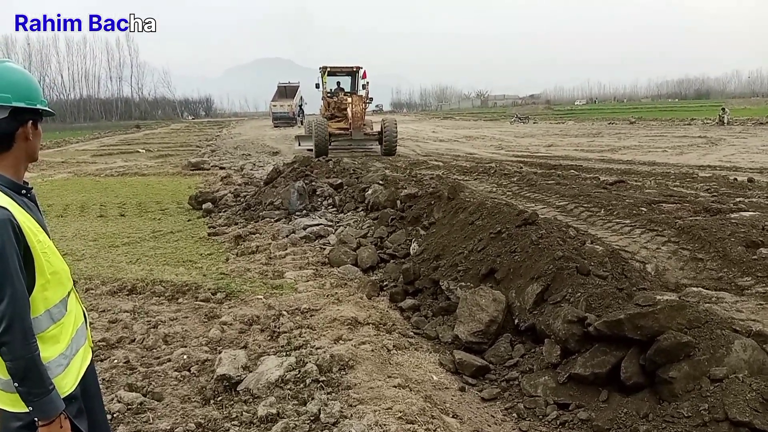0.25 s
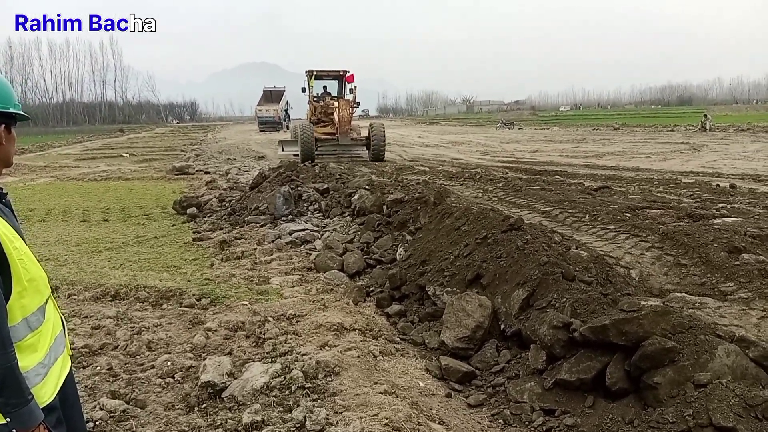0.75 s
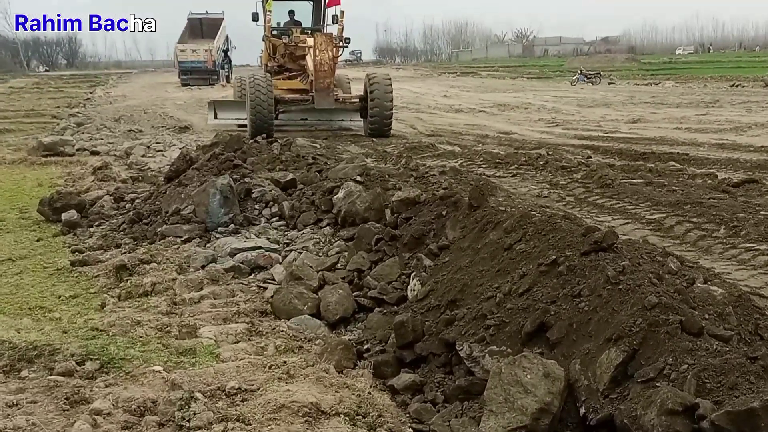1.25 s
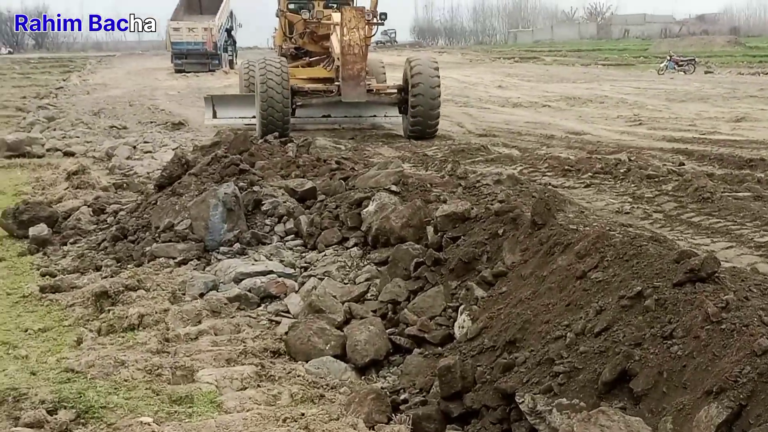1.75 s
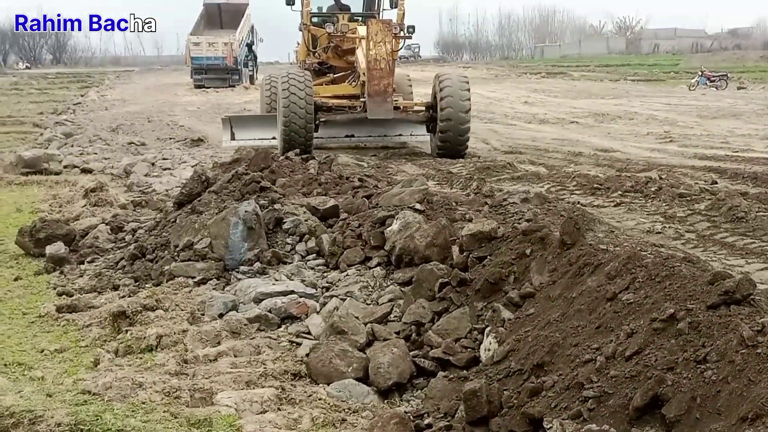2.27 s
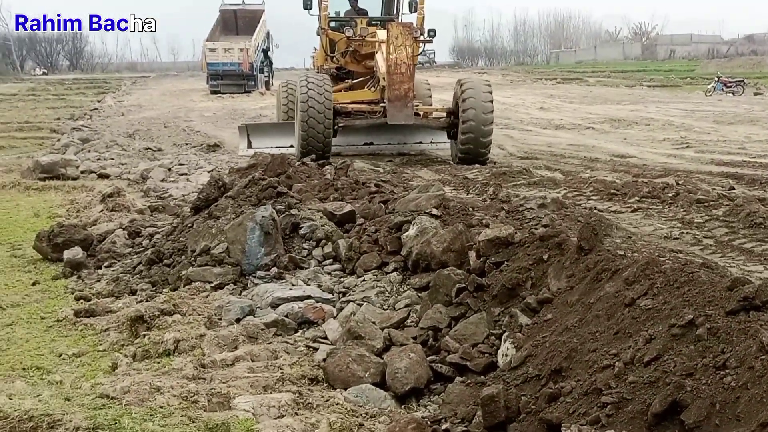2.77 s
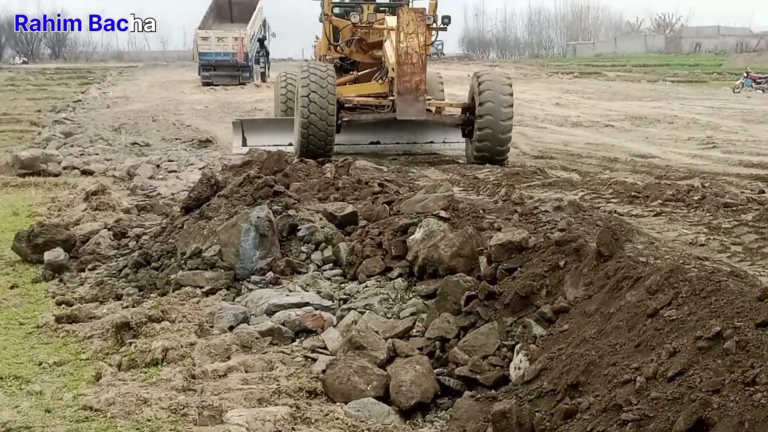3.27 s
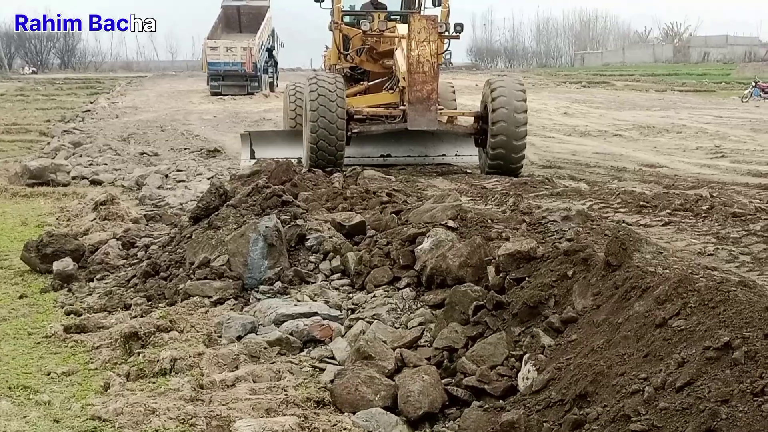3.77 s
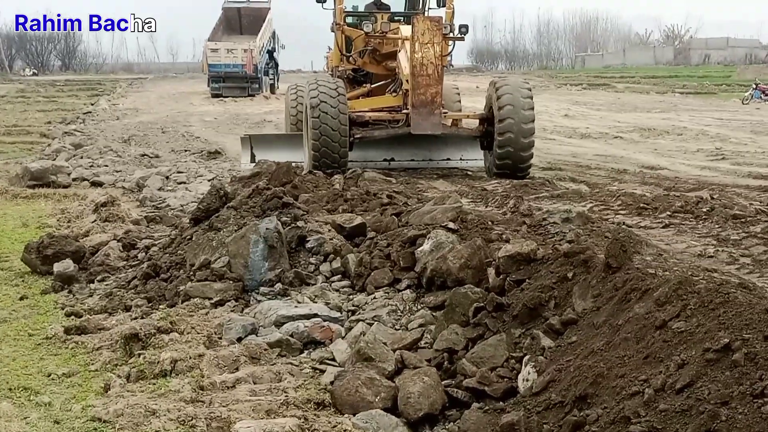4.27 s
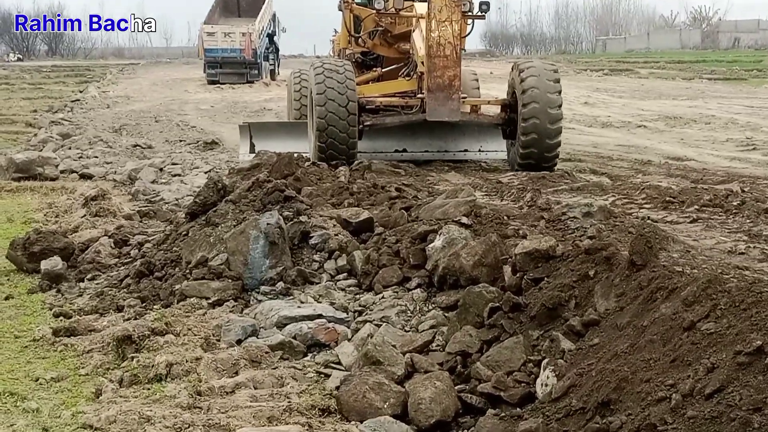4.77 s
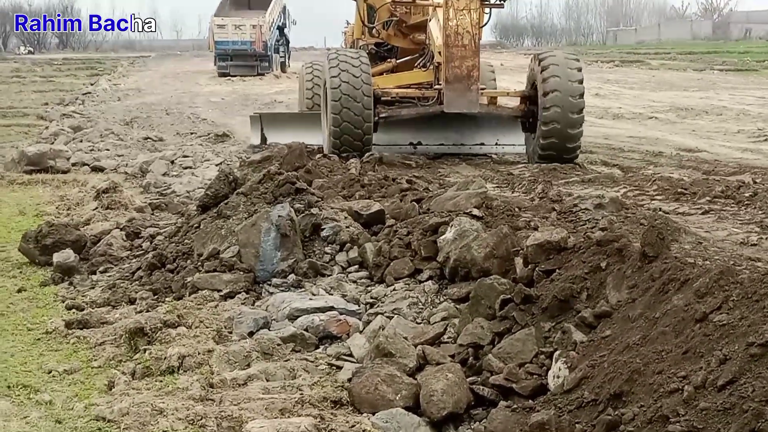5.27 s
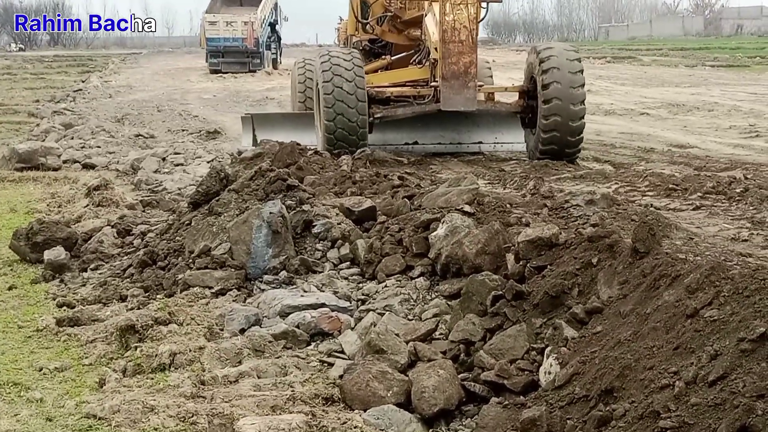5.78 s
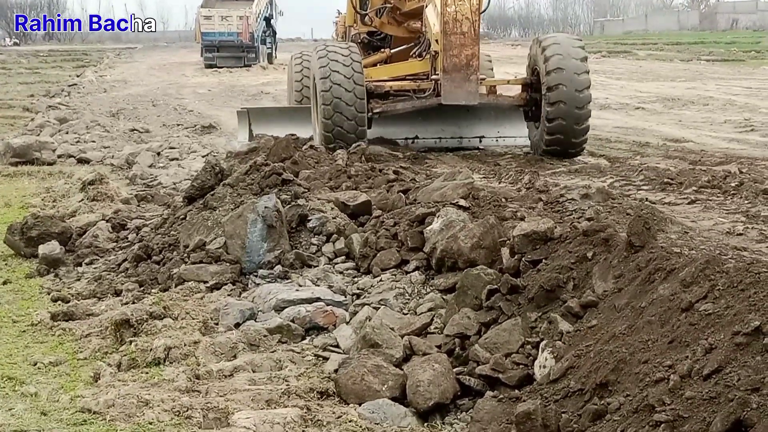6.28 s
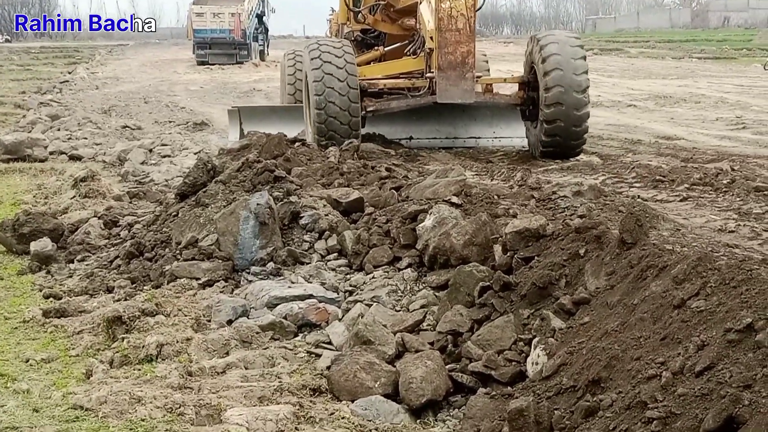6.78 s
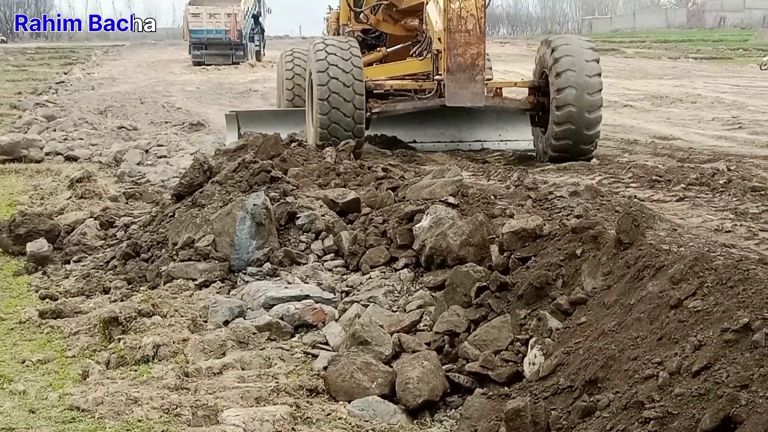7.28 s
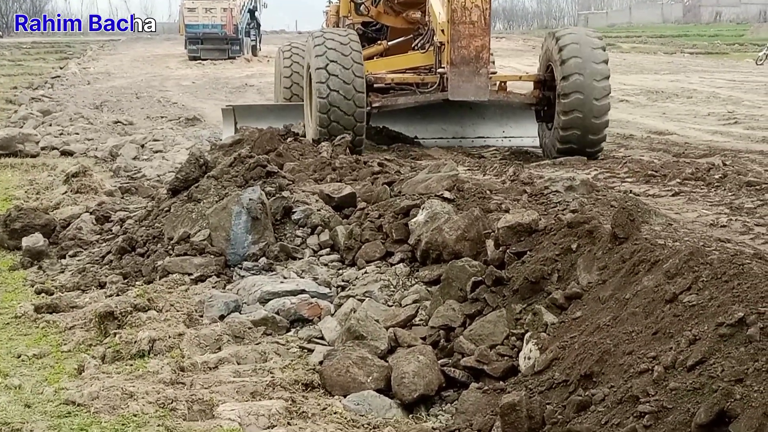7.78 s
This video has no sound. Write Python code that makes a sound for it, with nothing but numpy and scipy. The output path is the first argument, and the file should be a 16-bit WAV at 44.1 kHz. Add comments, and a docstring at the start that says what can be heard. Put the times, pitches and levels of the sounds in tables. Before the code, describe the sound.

A heavy diesel engine hums and knocks, lugging twice, while a blade pushes rumbling soil, cracking stones and crunching gravel outdoors.

```python
"""First heard is the hum and knock of a six-cylinder diesel: a motor grader creeps closer over open ground.
The hum is a harmonic series on the firing rate, lugging twice under load; noise bursts excite block and covers.
Filtered random impacts make the soil rumble, scrape and crunch; stones crack, pebbles ring the blade's edge,
and unsteady sinusoids give faint high tones and low groans. Near the start a small bird whistles four arched notes."""
import sys
import numpy as np
from scipy import signal
from scipy.fft import rfft, irfft, next_fast_len
from scipy.io import wavfile
from scipy.ndimage import uniform_filter1d, map_coordinates

SR = 44100
rng = np.random.default_rng(int(sys.argv[2]) if len(sys.argv) > 2 else 0)


def materialize(psi):
    """Save the field psi as 16-bit PCM at rate SR to the path in sys.argv[1].

    A 1-D psi becomes a single channel; in a 2-D psi each row is a channel.
    """
    bounded = np.clip(np.atleast_2d(psi).T, -1, 1)
    quanta = np.round(bounded * 32767).astype(np.int16)
    wavfile.write(sys.argv[1], SR, quanta)


N = 354343  # samples

# Spectra, as relative density: f/Hz, level/dB per Hz
AIR_SPECTRUM = [(20, 7), (33, 11.5), (48, 2), (120, 12), (300, -12), (450, -22.5), (1500, -21),
                (2700, -37.5), (6000, -44.5), (8000, -68), (15000, -47)]
BLOCK_SPECTRUM = [(230, -12), (300, -19), (430, -25.5), (540, -5), (830, 4.5), (975, -17), (1090, 3),
                  (1200, -1), (1460, -0.5), (1700, -10.5), (2000, -6.5), (2200, -1.5), (2450, -17),
                  (2700, -27), (3400, -36.5), (6000, -64)]  # engine block
RUMBLE_SPECTRUM = [(30, -60.5), (80, 5), (125, -0.5), (160, 4.5), (205, 7.5), (255, -2.5), (310, -2.5),
                   (400, -14), (450, -16.5), (700, -33.5), (2000, -66.5), (6000, -120)]  # rolling heap
SCRAPE_SPECTRUM = [(240, -30.5), (400, -10), (446, -16.5), (556, 0.5), (722, 0.5), (840, -2.5),
                   (969, -17.5), (1100, -8), (1400, -6.5), (1610, -17), (1780, -12.5), (2690, -16),
                   (3000, -36), (3900, -34), (6600, -120)]  # clods along the blade
GRIT_SPECTRUM = [(300, -58.5), (1200, -24), (2000, -10.5), (2950, -2.5), (3500, -5.5), (3950, -7),
                 (4180, 2.5), (4450, -1), (4750, 1), (5600, -1.5), (6250, -1.5), (6550, -13.5),
                 (7500, -33.5), (9500, -38.5), (15000, -54.5)]  # crushed gravel
CRACK_SPECTRUM = [(300, -45), (1000, -18), (2000, -4), (3300, 0), (6200, 0), (7000, -13), (8000, -28),
                  (9500, -40), (15000, -52)]  # cracking stone
SNAP_SPECTRUM = [(3000, -29), (7000, 11.5), (10000, -3.5), (15000, -11.5)]  # brittle stone
CLONK_SPECTRUM = [(120, -18), (280, -12), (450, -13), (620, -2.5), (740, 8), (950, -12.5), (1150, -7),
                  (1400, -4), (1700, -17.5), (2400, -19.5), (5000, -53), (9000, -100)]  # hollow clonk of a stone on the blade

# Bird notes: t/s, length/s, top f/Hz, share of the length at the top, relative level/dB, growth/dB per note
NOTES = [(0.777, 0.11, 5370, 0.21, -61, 9), (0.946, 0.135, 5430, 0.58, -63.5, 1),
         (1.157, 0.18, 5200, 0.39, -49.5, 4.5), (1.467, 0.095, 5620, 0.35, -61.5, -2)]
START_SHARE, END_SHARE = 0.63, 0.46  # pitch at the two ends of a note, over its top

# Faint thin high tones: t/s, length/s, f/Hz, relative level/dB
FAINT_TONES = [(1.298, 1.37, 7134, -75.5), (2.58, 0.094, 7150, -64.5), (3.149, 0.52, 7050, -71.5),
               (5.427, 0.09, 8395, -71), (5.92, .15, 7087, -75), (6.92, 0.28, 10750, -78)]

# Pebbles chinking against the blade: t/s, relative level/dB
PEBBLES = [(5.447, -54), (5.472, -57), (5.509, -52), (5.654, -71), (5.95, -62), (6.074, -55.5),
           (6.276, -51), (6.447, -58), (6.475, -54), (6.497, -64), (6.534, -51), (6.618, -54), (6.8, -52),
           (6.898, -55), (7.205, -58), (7.275, -64)]
# Modes of the steel edge: f/Hz, relative level/dB, t60/s
EDGE_MODES = [(5450, -5, .07), (6150, 2, .12), (6850, -4.5, 0.1), (8750, -24, .1), (9470, -31, 0.078),
              (10200, -30, 0.13), (11350, -28.5, 0.087)]
# Groans of the blade's frame when it bites: t/s, length/s, f/Hz, relative level/dB
GROANS = [(5.42, 0.16, 183, -44), (6.4, .25, 182, -46.5), (6.72, 0.68, 181, -39.5)]
# Stones breaking at the blade: t/s, then relative level/dB of crack, thud and snap
STONES = [(4.0652, -43, -53, -96), (4.555, -45, -54, -67), (5.015, -45.5, -57, -77),
          (5.203, -36.5, -55, -94), (5.224, -51, -48, -90), (5.331, -39, -34.5, -90),
          (5.3504, -33, -44, -91), (5.368, -33, -43, -86), (5.392, -38, -45, -92), (5.442, -36, -32.5, -66),
          (5.465, -35, -36, -78), (5.56, -39, -41, -90), (6.1781, -32, -37, -42.5),
          (6.231, -60, -30.5, -96), (6.283, -50, -31, -76), (6.3556, -47, -63, -75),
          (6.6805, -34, -35.5, -59), (6.737, -53, -40, -99), (6.842, -39, -34.5, -60),
          (7.206, -47, -34.5, -72), (7.984, -42, -59, -71)]

# How hard the blade is heard working the soil: t/s, push level/dB
PUSH = [(0, -17.5), (3.1, -12.5), (4.4, -6.5), (5.05, -7), (5.7, -0.5), (6.1, -1), (7.3, 2.5), (7.65, 1),
        (8.03, 3)]
# Clods tumbling off the blade: t/s, length/s, then relative level/dB of rumble, scrape and grit
CLODS = [(2.554, 0.085, -61.5, -63, -70), (3.494, 0.023, -55, -64, -60.5), (3.68, 0.14, -59, -53, -73),
         (4.038, 0.16, -54, -63, -64), (4.971, 0.11, -57, -78, -65.5), (5.07, .1, -51.5, -60, -68),
         (5.172, .11, -39, -45.5, -53), (5.344, 0.049, -34.5, -37.5, -40.5),
         (5.443, 0.061, -50, -41, -49.5), (5.49, 0.13, -52.5, -53, -50), (6.18, 0.13, -46, -50.5, -57.5),
         (6.347, 0.081, -47, -70, -83), (6.45, 0.09, -56.5, -68, -58.5), (6.62, 0.11, -57, -51.5, -57.5),
         (6.797, 0.17, -50, -47.5, -51.5), (6.956, 0.16, -59, -47.5, -52.5), (7.16, .12, -55, -45, -58.5),
         (7.886, 0.16, -55, -53, -70)]
RUMBLE_DB, SCRAPE_DB, GRIT_DB = -58.5, -50, -62.5  # steady soil at 0 dB push, relative level/dB
RUMBLE_GROWS, SCRAPE_GROWS, GRIT_GROWS = 0.9, 0.87, 0.95  # dB per dB of push
CLOD_ATTACK_S, CLOD_RELEASE_S = 0.012, 0.036  # linear rise; time constant of the settling

# Engine speed, sagging twice as the blade bites: t/s, firing rate f/Hz
SPEED = [(0.0, 70.17), (0.45, 70.14), (1.0, 64.2), (1.45, 62.8), (2.0, 62.07), (2.55, 64.37), (2.9, 69.12),
         (3.45, 70.55), (3.85, 69.52), (4.45, 73.69), (5.6, 70.44), (6.25, 72.05), (6.8, 61.7),
         (7.17, 62.04), (7.47, 73.08), (8.03, 73.2)]
FREE_HZ, LUG_HZ = 75.1, 60.65  # firing rate running free and under full load
# Exhaust hum, surging as the engine pulls free: t/s, rms level/dB of the fundamental
HUM = [(0.05, -37), (1.04, -35.5), (4.35, -34.5), (4.47, -36.5), (7.14, -33.5), (7.29, -30.5), (7.98, -34)]
# Overtones re the hum: multiple of the six-firing cycle rate, level/dB running free, level/dB at full load
OVERTONES = [(7, -30, -22.5), (8, -14.5, -26), (9, -21.5, -22.5), (10, -25, -14), (11, -29.5, -28.5),
             (12, -26.5, -4.5), (13, -30, -23), (14, -31.5, -20), (15, -32, -27), (16, -35, -25.5),
             (17, -31.5, -26), (18, -26.5, -24.5), (19, -38, -38.5), (20, -41, -32.5), (21, -47.5, -34.5)]
# Combustion knock, growing as the machine nears: t/s, relative level/dB
NEAR = [(0, -48.5), (.55, -50), (.7, -48.5), (1.3, -46), (3.05, -46), (3.4, -47.5), (3.9, -46), (5.5, -46),
        (8.03, -45)]
# Resonances of covers and injector lines: f/Hz, half-width/Hz at -6 dB, relative level/dB
COVERS = [(2170, 115, 0), (2980, 120, -2), (3760, 80, -12), (4257, 356, -8), (4593, 110, -5),
          (5325, 39, -2), (5814, 92, -6.5), (6960, 200, -23)]

TOP_HZ, FADE_S = 15700, .004  # passband edge; fade at each end


def amp(db):
    """Level: amplitude ratio is ten to the power of dB over twenty."""
    return 10 ** (np.asarray(db) / 20)


def unit(x):
    """Normalisation: the root mean square is scaled to 1."""
    return x / np.sqrt(np.mean(x ** 2) + 1e-20)


def curves(rows):
    """Linear interpolation: one value per sample for each column after the time."""
    s, *cols = np.transpose(rows)
    return [np.interp(np.arange(N) / SR, s, c) for c in cols]


def wobble(rate):
    """Smooth random modulation: a spline through Gaussian knots, rate of them per second."""
    knots = rng.standard_normal(int(N * rate / SR) + 4)
    fine = np.arange(0, len(knots) - 1, 1 / 16)
    return np.interp(np.arange(N) * rate / SR, fine, map_coordinates(knots, [fine]))


def filtered(x, response):
    """Linear filtering: the spectrum is multiplied by a response of frequency."""
    size = next_fast_len(N + SR // 2)
    return irfft(rfft(x, size) * response(np.fft.rfftfreq(size, 1 / SR)), size)[:N]


def colour(x, points):
    """Minimum-phase filtering: a folded cepstrum makes the filter causal; white noise keeps its level."""
    size = 2 ** 13
    hz, db = np.transpose(points)
    bins_hz = np.fft.rfftfreq(size, 1 / SR)
    gain = unit(amp(np.interp(np.log(bins_hz + 1), np.log(hz), db)))
    cepstrum = irfft(np.log(gain + 1e-6))
    cepstrum[1:size // 2] *= 2
    cepstrum[size // 2 + 1:] = 0
    impulse_response = irfft(np.exp(rfft(cepstrum)))
    return signal.fftconvolve(x, impulse_response)[:N]


def resonate(x, modes):
    """Modal superposition: each mode is a squared second-order resonance, and the modes add."""
    def response(f):
        total = 0
        for centre, half_width, db in modes:
            damping = 1j * f * 2 * half_width
            total = total + amp(db) * (damping / (centre * centre - f * f + damping)) ** 2
        return total
    return filtered(x, response)


def ringing(x, decay, share=0.33):
    """Reverberation: a share of the energy lingers as exponentially decaying noise, decay its time in s."""
    t = np.arange(SR // 6) / SR
    body = rng.standard_normal(len(t)) * np.exp(-t / decay)
    body *= np.sqrt(share) / np.linalg.norm(body)
    body[0] = np.sqrt(1 - share)  # direct sound
    return signal.fftconvolve(x, body)[:N]


def flicker(x, depth_db, size=(3, 5)):
    """Random modulation: level varies in patches of time and pitch; size is in (bins, frames)."""
    z = signal.stft(x, nperseg=512)[2]
    field = rng.standard_normal(z.shape)
    for axis in (0, 1, 0, 1):
        field = uniform_filter1d(field, size[axis], axis)
    return unit(signal.istft(z * amp(depth_db * unit(field)), nperseg=512)[1][:N])


def grains(rate, spread_db):
    """Shot noise: random tiny impacts, rate per second on average, of widely different sizes; rms 1."""
    hits = rng.random(N) < rate / SR
    sizes_db = spread_db * np.clip(rng.standard_normal(N), -2, 2)
    return unit(hits * rng.standard_normal(N) * amp(sizes_db))


def unsteady_tones(rows, jitter, jitter_rate, stutter_db):
    """Random frequency and amplitude modulation: narrow tones wavering in pitch and level."""
    out = np.zeros(N)
    for s, length, hz, db in rows:
        swell = np.hanning(int(length * SR))
        pitch = hz * (1 + jitter * wobble(jitter_rate)[:len(swell)])
        out[round(s * SR):][:len(swell)] += amp(db) * swell * np.sin(2 * np.pi * np.cumsum(pitch) / SR)
    return out * amp(stutter_db * wobble(30))


def open_air():
    """Broadband noise: white noise is shaped by the spectrum of the open air."""
    return amp(-52.5) * unit(colour(rng.standard_normal(N), AIR_SPECTRUM))


def faint_tones():
    """Narrowband sound: fast pitch jitter roughens faint, thin high tones."""
    return unsteady_tones(FAINT_TONES, jitter=.012, jitter_rate=600, stutter_db=4)


def bird():
    """Frequency modulation: whistles arch up, turn hoarse as they slide down, and the field scatters them."""
    song = np.zeros(N)
    for s, length, top_hz, crest, db, growth_db in NOTES:
        u = np.linspace(0, 1, int(length * SR))
        rising = np.maximum(1 - u / crest, 0)
        falling = np.maximum((u - crest) / (1 - crest), 0)
        rasp = .035 * falling * wobble(900)[:len(u)]
        arch = 1 - (1 - START_SHARE) * rising ** 2 - (1 - END_SHARE) * falling ** 1.9
        pitch = top_hz * (arch + rasp)
        level = amp(db + growth_db * (u - 1.5)) * np.sqrt(np.abs(np.sin(np.pi * u)))
        song[round(s * SR):][:len(u)] += level * np.sin(2 * np.pi * np.cumsum(pitch) / SR)
    # moving air makes the distant song fade in and out
    fading = amp(3.5 * wobble(70) - .7)
    return ringing(song * fading, decay=.04, share=.22)


def pebbles():
    """Modal excitation: each pebble strikes another spot, varying the modes in strength and a little in pitch."""
    out = np.zeros(N)
    t = np.arange(SR // 6) / SR
    for s, db in PEBBLES:
        draws = rng.standard_normal((len(EDGE_MODES), 2)) * [5, .015]  # dB, share of the pitch
        ring = np.zeros(len(t))
        for (hz, level, t60), (change, detune) in zip(EDGE_MODES, draws):
            ring += amp(level + change - 60 * t / t60) * np.sin(2 * np.pi * hz * (1 + detune) * t)
        out[round(s * SR):][:len(t)] += amp(db) * (1 - np.exp(-t / 0.0041)) * ring
    return ringing(out, decay=.008, share=.4)


def blade_groans():
    """Narrowband sound: the blade's frame groans in low, slowly wavering tones when it bites."""
    return unsteady_tones(GROANS, jitter=.015, jitter_rate=25, stutter_db=2)


def stones():
    """Brittle fracture: a short spray of cracks over a dull knock; brittle stones snap brightly."""
    crack, thud, snap = np.zeros((3, N))
    for s, crack_db, thud_db, snap_db in STONES:
        start = round(s * SR)
        age = np.arange(min(SR // 5, N - start)) / SR
        span = slice(start, start + len(age))
        rise = 1 - np.exp(-age / 0.0013)
        crack[span] += amp(crack_db - 4.5) * rise * np.exp(-age / .011)
        thud[span] += amp(thud_db - 3.5) * np.exp(-age / 0.016)
        snap[span] += amp(snap_db) * rise * np.exp(-age / .005)
    splinters = ringing(rng.standard_normal(N), decay=.0011)
    cracks = colour(crack * splinters, CRACK_SPECTRUM)
    snaps = colour(snap * splinters, SNAP_SPECTRUM)
    thuds = colour(thud * rng.standard_normal(N), CLONK_SPECTRUM)
    return cracks + snaps + thuds


def soil_levels():
    """Addition of power: a steady flow follows the push, and every clod breaks loose, rolls and settles."""
    t = np.arange(SR // 2) / SR
    push_db = curves(PUSH)[0] + 1.2 * wobble(18)
    steady_db = [RUMBLE_DB + RUMBLE_GROWS * push_db,
                 SCRAPE_DB + SCRAPE_GROWS * push_db,
                 GRIT_DB + GRIT_GROWS * push_db]
    power = amp(steady_db) ** 2
    for s, length, *levels_db in CLODS:
        start = round(s * SR)
        swell = np.minimum(t / CLOD_ATTACK_S, 1) * np.exp(-np.maximum(t - length, 0) / CLOD_RELEASE_S)
        power[:, start:start + len(t)] += np.outer(amp(levels_db), swell[:N - start]) ** 2
    return 10 * np.log10(power)


def soil():
    """Granular impact noise: the heap rumbles, clods scrape along the blade and gravel is crushed."""
    rumble_db, scrape_db, grit_db = soil_levels()
    rumble = amp(rumble_db + 7.5) * unit(colour(grains(rate=1800, spread_db=-1.5), RUMBLE_SPECTRUM))
    scrape = amp(scrape_db) * unit(colour(grains(rate=5000, spread_db=0.5), SCRAPE_SPECTRUM))
    # the gravel rings the blade as it breaks
    breaking = ringing(grains(rate=8000, spread_db=2.5), decay=.004, share=.15)
    gravel = flicker(colour(breaking, GRIT_SPECTRUM), depth_db=3, size=(2, 7))
    # single larger grains crackle on top
    larger = ringing(grains(rate=450, spread_db=1.5), decay=.001, share=.7)
    crackle = unit(colour(larger, CRACK_SPECTRUM))
    return rumble + scrape + amp(grit_db) * (.92 * gravel + .32 * crackle)


def firings(turns, decay, fresh, scatter_db, count=6):
    """Periodic excitation: each cylinder repeats its own burst, a share of its power new at every firing."""
    at = np.flatnonzero(np.diff(np.floor(turns)) > 0)
    t = np.arange(SR // 12) / SR
    own = rng.standard_normal((count, len(t)))[np.arange(len(at)) % count]
    bursts = np.sqrt(1 - fresh) * own + np.sqrt(fresh) * rng.standard_normal(own.shape)
    bursts *= np.exp(-t / decay) * amp(scatter_db * rng.standard_normal((len(at), 1)))
    # overlapping bursts add up
    places = at[:, None] + np.arange(len(t))
    return unit(np.bincount(places.ravel(), bursts.ravel(), N)[:N])


def knock(turns):
    """Forced vibration: combustion shakes the block and rings its thin covers, louder as the machine nears."""
    near_db, = curves(NEAR)
    blows = firings(turns, decay=.036, fresh=.2, scatter_db=.7)
    clatter = firings(turns, decay=.04, fresh=.4, scatter_db=.7)
    # the bounce off the ground cuts the notches in the block's spectrum
    block = flicker(colour(blows, BLOCK_SPECTRUM), depth_db=2.3, size=(2, 11))
    covers = flicker(resonate(clatter, COVERS), depth_db=4.2, size=(2, 12))
    covers_db = -66.0 + .5 * (near_db + 51.5)
    return amp(near_db - 5.0) * block + amp(covers_db) * covers


def exhaust(turns, hum_db, load):
    """Harmonic series: load sharpens the firing pulses, and unequal cylinders add tones in between."""
    phase = 2 * np.pi * turns
    cycle = phase / 6  # six firings to a cycle
    tones = np.cos(phase)
    for order, free_db, load_db in OVERTONES:
        between = order % 6 != 0  # not a multiple of the firing rate
        offset = rng.uniform(0, 2 * np.pi) if between else 0
        waver = amp((1.8 if between else .7) * wobble(7))
        level_db = free_db + (load_db - free_db) * load
        tones += amp(level_db) * waver * np.cos(order * cycle + offset)
    return np.sqrt(2) * amp(hum_db) * tones


def engine():
    """Load and speed: the further the speed sags, the higher the load that sets the exhaust overtones."""
    firing_hz, = curves(SPEED)
    hum_db, = curves(HUM)
    load = np.clip((FREE_HZ - firing_hz) / (FREE_HZ - LUG_HZ), 0, 1)
    turns = np.cumsum(firing_hz) / SR + 3 / 4  # running count of firings
    return exhaust(turns, hum_db, load) + knock(turns)


def scene():
    """Superposition: the sounds of the open air, the faint tones, the bird and the grader add."""
    background = open_air() + faint_tones() + bird()
    ground = pebbles() + blade_groans() + stones() + soil()
    return (background + ground + engine())[None]


def record(dry):
    """Band limitation: the ends are faded and a steep elliptic low-pass removes the highest treble."""
    t = np.arange(N) / SR
    fade = np.minimum(np.minimum(t, t[::-1]) / FADE_S, 1)
    low_pass = signal.ellip(10, .1, 70, TOP_HZ, fs=SR, output="sos")
    return signal.sosfilt(low_pass, dry * fade)


dry = scene()
out = record(dry)
materialize(out)
```